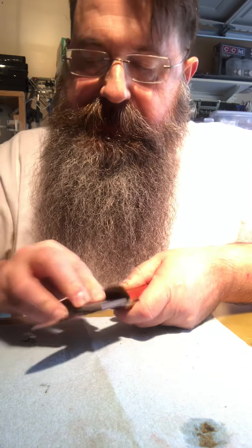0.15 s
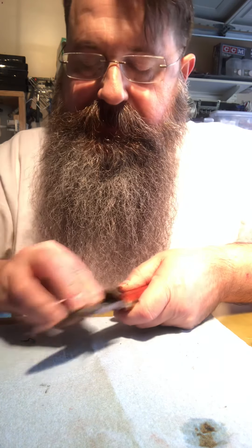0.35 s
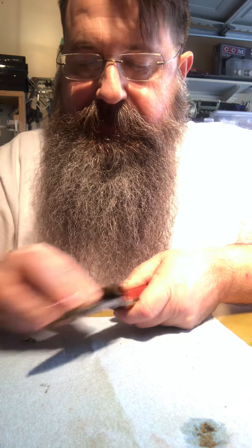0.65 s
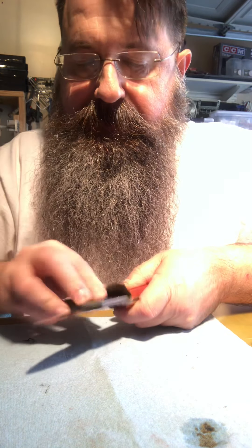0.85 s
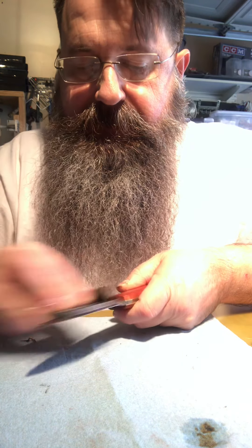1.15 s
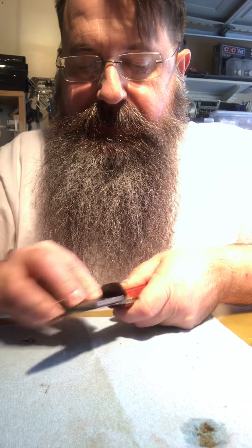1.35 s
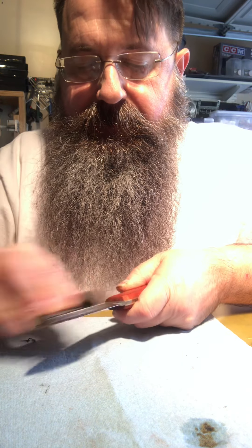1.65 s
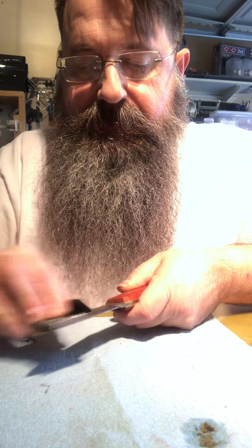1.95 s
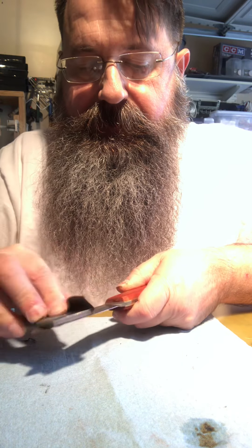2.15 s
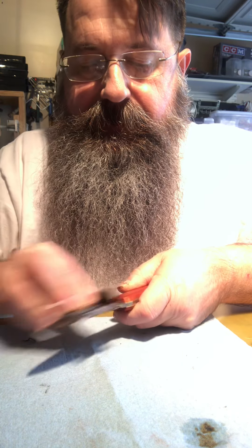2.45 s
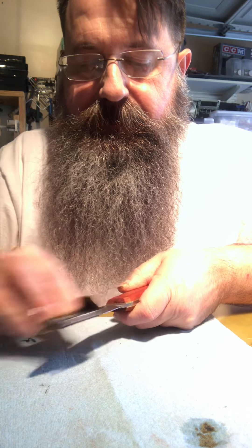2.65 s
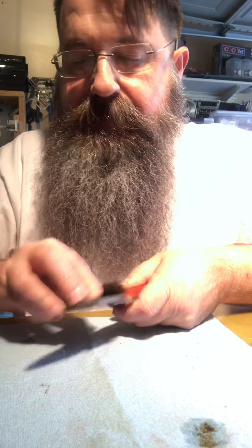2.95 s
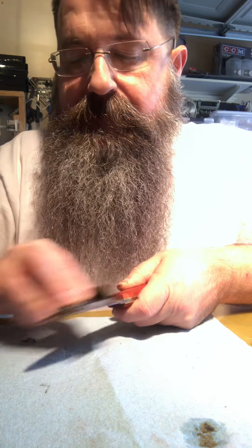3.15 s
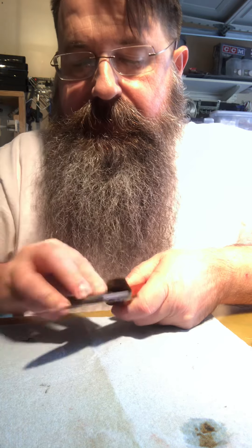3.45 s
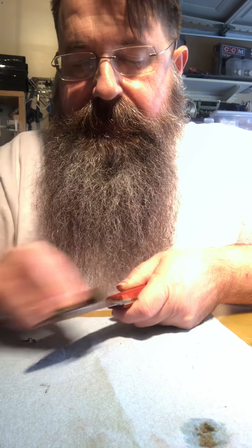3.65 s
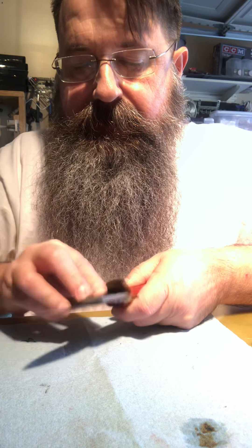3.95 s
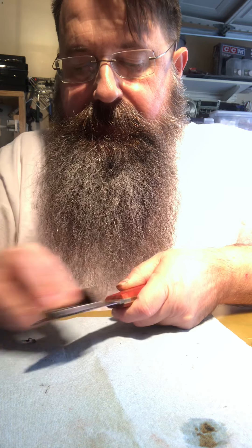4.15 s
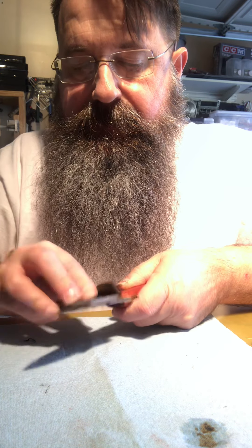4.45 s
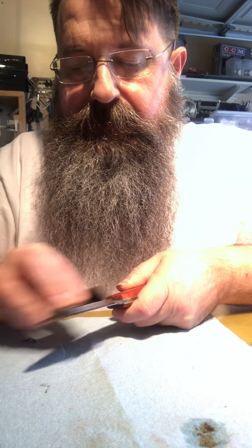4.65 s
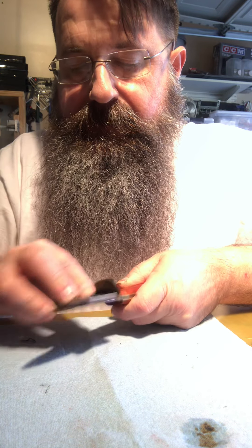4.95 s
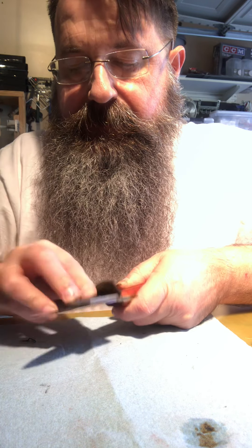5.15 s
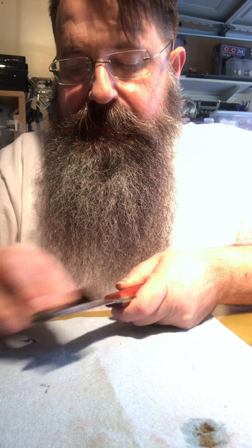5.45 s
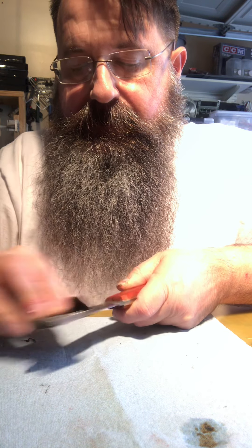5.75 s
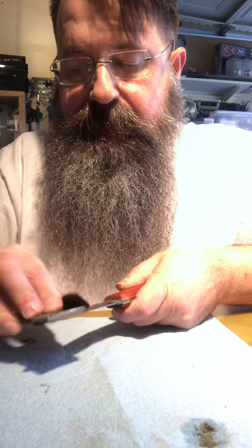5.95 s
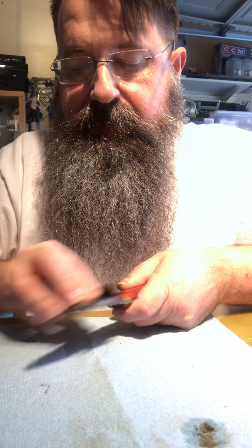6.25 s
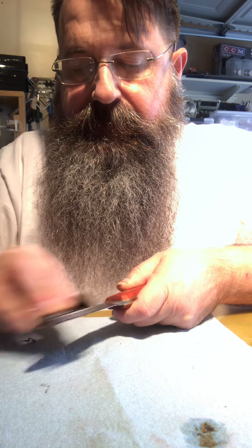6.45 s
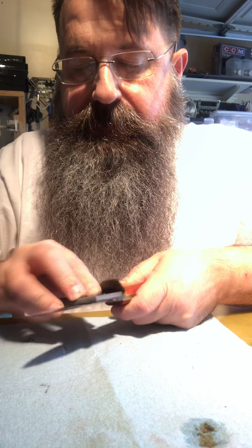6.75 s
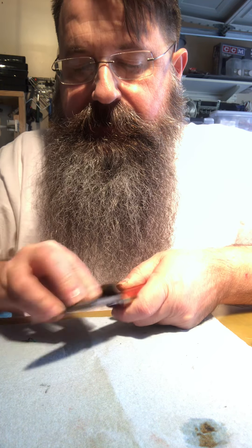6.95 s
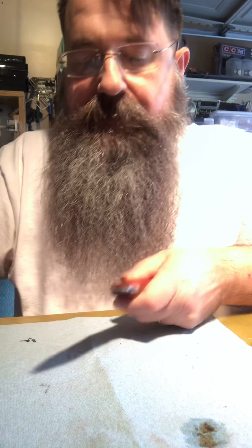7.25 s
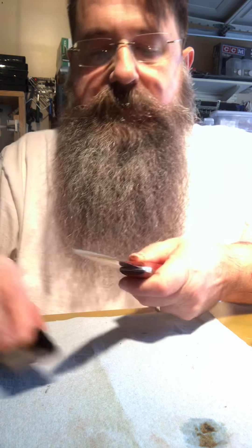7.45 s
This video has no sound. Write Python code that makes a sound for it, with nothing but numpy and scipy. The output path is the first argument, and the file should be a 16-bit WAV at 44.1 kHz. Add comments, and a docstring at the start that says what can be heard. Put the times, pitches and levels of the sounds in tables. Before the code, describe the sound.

In a small workshop with a faint mains hum, a block in wet sandpaper scrubs a hand-held knife blade at about eight strokes a second. Each stroke is a bright gritty hiss with a hollow, sliding tone. Irregular knocks against the handle crack sharply, strongest near the middle. Finally the rubbing stops, and the block brushes and clacks onto the covered bench. One microphone sits across the bench, fairly dry.

```python
"""A small workshop with mains hum and a low rush of air, one microphone across the bench.
A block in wet sandpaper rubs to and fro along a hand-held knife blade, about eight strokes a second.
Scratch noise makes the grit's hiss, and swept resonances make hollow notes that slide with the block.
Now and then the block knocks against the handle, and the gripped knife answers with short dying modes.
At the end it slips off the tip and is put down on the covered bench, with brushing noise and quick touches."""
import sys
import numpy as np
from scipy import signal
from scipy.fft import rfft, irfft
from scipy.io import wavfile

SR = 44100
rng = np.random.default_rng(int(sys.argv[2]) if len(sys.argv) > 2 else 0)


def waveform_to_disk(signal):
    """Save audio, clipped to [-1, 1], as 16-bit WAV at the path in sys.argv[1]."""
    frames = np.transpose(np.atleast_2d(signal))
    scaled = np.clip(frames, -1, 1) * 32767
    samples = np.round(scaled).astype(np.int16)
    wavfile.write(sys.argv[1], SR, samples)


N = 334719
TIME = np.arange(N) / SR  # s
BINS = np.fft.rfftfreq(N, 1 / SR)  # Hz
LIFT_OFF = 7.15  # s, the last stroke ends


def amp(db):
    """Decibels to gain."""
    return 10 ** (np.asarray(db) / 20)


def unit(x):
    """Scales to rms 1."""
    return x / np.sqrt(np.mean(x ** 2) + 1e-20)


def peaked(x, db):
    """Scales to a peak level."""
    return amp(db) * x / abs(x).max()


def read(points, hz):
    """Reads a table of values against frequency on a log-frequency axis."""
    f, value = np.transpose(points)
    return np.interp(np.log(hz + 1), np.log(f + 1), value)


def add(mix, s, sound):
    """Mixes a sound in at time s."""
    part = mix[round(s * SR):][:len(sound)]
    part += sound[:len(part)]


def coloured(x, db):
    """Gives x a spectrum, at rms 1."""
    return unit(irfft(rfft(x) * amp(db), N))


def noise():
    """White noise as long as the scene."""
    return rng.standard_normal(N)


def wander(hz):
    """Random drift of rms 1, rolled off steeply above hz."""
    return unit(irfft(rfft(noise()) / (1 + (BINS / hz) ** 4), N))


def grit(per_s, spread_db, share):
    """Countless tiny scratches as steady noise, plus a share of separate larger ones."""
    fine = noise()
    size = amp(spread_db * np.minimum(rng.exponential(1, N), 4))
    struck = rng.random(N) < per_s / SR
    grains = noise() * size * struck
    return unit(fine + share * unit(grains))


def resonate(x, hz, width):
    """A resonance that follows the curve hz: x is turned down to zero, smoothed and turned back."""
    turn = np.exp(2j * np.pi * np.cumsum(hz) / SR)
    r = np.exp(-np.pi * width / SR)
    return unit((turn * signal.lfilter([1 - r], [1, -r], x / turn)).real)


def ring(modes, detune, spread_db=0):
    """Dying modes of alternating sign; the grip shifts their pitch, the place of the blow their strength."""
    t = TIME[:SR // 4]
    out = np.zeros(len(t))
    chance = rng.uniform(-1.24, 1, (len(modes), 2))
    for k, ((hz, db, t60), (shift, strength)) in enumerate(zip(modes, chance)):
        fade = amp(db + spread_db * strength - 60 * t / t60)
        out += (-1) ** k * fade * np.sin(2 * np.pi * hz * (1 + detune * shift) * t)
    return out


# Mains hum before its slow waver: [f/Hz, rms level/dB]
HUM_TONES = [(120, -49.5), (240, -78.5), (360, -83)]
# Spectrum shape of the air in the workshop: [f/Hz, relative level per Hz/dB]
AIR_SPECTRUM = [(20, -27.5), (35, -3), (55, 6.5), (90, 7.5), (150, -2), (210, -12), (280, -12), (500, -19),
                (1500, -17.5), (2600, -19), (4000, -26), (16000, -27)]


def workshop(air_db=-56, waver_db=0.7, waver_hz=9):
    """Slightly wavering mains hum over a low rush of air."""
    hum = np.zeros(N)
    for hz, db in HUM_TONES:
        hum += amp(db) * np.sqrt(2) * np.sin(2 * np.pi * (hz * TIME + rng.random()))
    air = amp(air_db) * coloured(noise(), read(AIR_SPECTRUM, BINS))
    return hum * amp(waver_db * wander(waver_hz)) + air


# Spectrum shape of the shaken bench: [f/Hz, relative level per Hz/dB]
RUMBLE_SPECTRUM = [(20, -72), (50, 2.5), (85, -9), (150, -0.5), (230, -21), (600, -23.5), (2000, -70)]


def handling(rumble_db=-61.0, swing_db=3.5, swing_hz=11):
    """The working arms shake the bench: low noise of unsteady level that ends at lift-off."""
    level = amp(rumble_db + swing_db * wander(swing_hz))
    working = np.clip((LIFT_OFF - TIME) * 20, 0, 1)
    return level * working * coloured(noise(), read(RUMBLE_SPECTRUM, BINS))


# Pace of the hand, even between points; even-numbered strokes run towards the handle: [t/s, strokes done]
HAND_PACE = [(.01, 0), (.943, 8), (1.076, 9), (1.43, 12), (1.564, 13), (2.605, 22), (2.713, 23), (2.96, 25),
             (3.061, 26), (3.196, 27), (3.432, 29), (4.21, 35), (4.923, 41), (5.244, 44), (5.598, 47),
             (6.161, 52), (6.513, 55), (6.956, 59)]


def hand_motion(tip_lead=0.021):
    """Stroke number, phase within it (0 to 1), direction and place of the block along the blade."""
    times, done = np.transpose(HAND_PACE)
    done = np.round(done)
    progress = np.interp(TIME, np.append(times, LIFT_OFF), np.append(done, done[-1] + 1))
    # strokes towards the tip set off early by this share of a stroke
    progress += tip_lead * np.sin(np.pi / 2 * progress) ** 2
    stroke, phase = progress.astype(int), progress % 1
    push = stroke % 2 - 0.5  # +0.5 towards the tip, -0.5 towards the handle
    place = (1 - np.cos(np.pi * progress)) / 2  # 0 at the tip, 1 at the handle
    return stroke, phase, push, place


def hand_pressure(stroke, phase, ease_db=-0.6, stop_db=-15, stop_s=0.0091, stuck_db=-3, breakaway=0.11):
    """Gain from the hand's press: unsteady, easing along each stroke, lower while the wet paper clings."""
    # a knock stops the block dead, ahead of the turn
    stopped = np.zeros(N)
    for at, *_ in HANDLE_KNOCKS:
        stopped += np.exp(-((TIME - at - stop_s) / (0.5 * stop_s)) ** 4)
    unsteady = 0.98 * wander(26) + 1.18 * wander(210)  # dB: slow pressure, quick chatter
    unsteady += 1.34 * noise()[stroke]  # dB: no two strokes are quite alike
    # the paper clings at each turn, then breaks loose at this share of the stroke
    clinging = np.clip((breakaway - phase) * 20 + 0.5, 0, 1)
    db = stuck_db * clinging + ease_db * (phase - 0.5) + unsteady + stop_db * stopped
    return amp(db) * (TIME < LIFT_OFF)


def stroke_db(phase, rise, fall, start_db, stop_db, arch_db, rest=0.021):
    """Level within a stroke: the block gathers speed, glides, brakes and rests for a share of the stroke."""
    starting = np.cos(np.pi / 2 * np.clip(phase / rise, 0, 1)) ** 2
    stopping = np.clip(1 - (1 - rest - phase) / fall, 0, 1) ** 2
    return start_db * starting + stop_db * stopping + arch_db * np.sin(np.pi * phase)


def shifting(x, depth_db, count=7):
    """Broad bands swell and sink on their own as the wet paper rocks on the steel; the lowest holds the bass."""
    centres, spectrum = np.linspace(3500, 15500, count), rfft(x)
    out = np.zeros(N)
    for band in np.eye(count):
        part = irfft(spectrum * np.interp(BINS, centres, band), N)
        out += part * amp(depth_db * wander(6.8))
    return out


# Spectrum shapes of coarse rasp and fine fizz: [f/Hz, relative level per Hz/dB]
RASP_SPECTRUM = [(300, -36), (800, -67), (1400, -14.5), (2800, -13), (3700, -9), (4600, -3.5), (5400, 1),
                 (6600, 0.5), (9800, -0.5), (11500, -15.5), (16000, -55)]
FIZZ_SPECTRUM = [(4000, -45.5), (8000, -4), (10500, -6), (12300, 1), (14500, 2), (16000, -2)]
# Peaks and dips of blade and block: [f/Hz, width/Hz, level/dB]
BLADE_PEAKS = [(2690, 280, 3), (3140, 200, -0.5), (3674, 75, 4), (4000, 140, -1), (4500, 147, 5.5),
               (5256, 120, 4.5), (5600, 200, 0.5), (6670, 520, 3.5), (10400, 230, -4)]
# How hard the paper bites, before the trims below: [t/s, rasp level/dB, fizz level/dB]
PAPER_BITE = [(0, -36.5, -34), (.4, -35.5, -32.5), (.75, -37.5, -34.5), (1.35, -37, -32.5),
              (1.6, -37.5, -35), (2.25, -37.5, -34.5), (2.55, -38, -33), (2.9, -37, -32.5),
              (3.15, -37, -33.3), (3.6, -38, -33), (4.0, -38, -33), (4.499, -36.5, -33), (4.8, -39, -36.5),
              (5.4, -38.5, -36), (5.8, -38.5, -35.5), (6.3, -38.5, -34), (7.0, -37.5, -34)]
# Swell and stop of each stroke; the fizz needs more speed than the rasp. One row each:
# [rise/share of stroke, fall/share of stroke, level at start/dB, level at stop/dB, extra at mid-stroke/dB]
RASP_SWELL = (0.2227, 0.12, -12.5, -28, -3)
FIZZ_SWELL = (0.26, 0.1448, -20.5, -35, 3.0)
# Hollow notes, loudest shortly after a turn: columns as above
HOLLOW_SWELL = (0.1, 0.34, -6, -17, -4.5)
# Hollow notes under the hand, before drift: [f at tip/Hz, f at handle/Hz, level at tip/dB, level at handle/dB]
HOLLOW_NOTES = [(1105, 1810, -26.5, -18.5), (2040, 2550, -15.5, -22.5), (3710, 4000, -21.5, -20)]


def hollow_notes(judder, place, width_hz=330, drift=0.05, flutter_db=2.5):
    """Scratches drive resonances whose pitch and level slide with the block."""
    out = np.zeros(N)
    for tip_hz, handle_hz, tip_db, handle_db in HOLLOW_NOTES:
        grip = 1 + drift * wander(5)
        hz = grip * (tip_hz + (handle_hz - tip_hz) * place)
        note = resonate(grit(1300, 4.0, 0.61), hz, width_hz)
        note = resonate(note, hz, width_hz)  # the second pass steepens the skirts
        out += judder * amp(tip_db + (handle_db - tip_db) * place + flutter_db * wander(20)) * note
    return out


def sanding(rasp_db=-3.5, fizz_db=-4.5, hollow_db=-1.7, tip_rasp_db=3.0, tip_fizz_db=3.0, lift_s=0.09):
    """Grit scratches the steel while the block moves, and sinks at each turn; hollow notes slide with it."""
    stroke, phase, push, place = hand_motion()
    s, rasp_bite, fizz_bite = np.transpose(PAPER_BITE)
    press = hand_pressure(stroke, phase)
    # the factors of push are level differences between strokes to the tip and to the handle (dB)
    drag = press * amp(np.interp(TIME, s, rasp_bite) - 0.8 * push)
    coarse = drag * amp(stroke_db(phase, *RASP_SWELL))
    judder = drag * amp(hollow_db - 1.2 * push + stroke_db(phase, *HOLLOW_SWELL))
    fine = press * amp(np.interp(TIME, s, fizz_bite) + stroke_db(phase, *FIZZ_SWELL))
    fine *= np.clip((LIFT_OFF - TIME) / lift_s, 0, 1)  # the fizz goes first as the paper leaves the steel

    body = sum(db * np.exp(-((BINS - hz) / width) ** 2) for hz, width, db in BLADE_PEAKS)
    rasp = coloured(grit(3000, 2.2, 0.4), read(RASP_SPECTRUM, BINS) + body)
    fizz = coloured(grit(5000, 2.08, 0.27), read(FIZZ_SPECTRUM, BINS) + body)
    # the free tip sounds more readily than the gripped end
    towards_tip = 0.5 - place
    hiss = amp(rasp_db + tip_rasp_db * towards_tip) * coarse * rasp
    hiss += amp(fizz_db + tip_fizz_db * towards_tip) * fine * fizz
    return shifting(hiss, depth_db=1.22) + hollow_notes(judder, place)


# Coarse grit snags under the paper: [t/s, peak level/dB, f/Hz]
GRIT_SNAGS = [(0.029, -41, 1400), (0.194, -25.5, 7000), (.258, -38.5, 1380), (0.496, -39.5, 2150),
              (1.450, -44, 1310), (2.157, -40.5, 2260), (3.082, -40.5, 1350), (4.346, -43, 2060),
              (5.489, -46, 1210)]


def snags(length_s=0.0021):
    """Short scrapes where a coarse grain catches: noise bursts in a band around one frequency."""
    out, t = np.zeros(N), TIME[:SR // 20]
    for s, db, hz in GRIT_SNAGS:
        scrape = t * np.exp(-t / length_s) * rng.standard_normal(len(t))
        band = signal.butter(2, [0.77 * hz, 1.29 * hz], "band", fs=SR)
        add(out, s - length_s, peaked(signal.lfilter(*band, scrape), db))  # its swell peaks at s
    return out


# The block meets the handle, last of all slips off the tip: [t/s, peak level/dB, lowest f/Hz, hardness f/Hz]
HANDLE_KNOCKS = [(0.363, -20.5, 930, 1080), (.8080, -25.5, 335, 2200), (1.058, -28.5, 336, 2440),
                 (1.7801, -30, 413, 1030), (2.006, -15, 510, 3540), (2.4675, -21, 546, 2250),
                 (2.6899, -7, 664, 2700), (3.4102, -14.5, 576, 2800), (3.6712, -6, 517, 4400),
                 (3.9253, -3.5, 530, 6440), (6.2580, -23, 503, 1960), (7.118, -27.5, 224, 1240)]
# Modes of the gripped knife before each blow's small shifts: [f/Hz, level/dB, t60/s]
KNIFE_MODES = [(356, -14, 0.057), (577, -16.5, 0.024), (1236, 3.5, 0.0052), (1425, 1.5, 0.008),
               (1860, 1, 0.0066), (2550, -4.5, 0.015), (2870, 0.5, 0.011), (4130, 8.5, 0.004),
               (4760, 3.5, 0.0086), (5270, 10.5, 0.0054), (6850, 14.5, 0.0023), (12700, 0, 0.0022)]


def knife_contact(t, rattle_s=0.0013, rattle=0.17, rebound_s=0.001348, rebound=0.25):
    """Force of one blow: a click, a brief rattle, and a rebound about rebound_s later."""
    contact = rattle * np.exp(-t / rattle_s) * (rng.random(len(t)) - 0.5)
    contact[0] = 1
    contact[round(rebound_s * rng.uniform(0.7, 1.3) * SR)] += rebound
    return contact


def knocks(crack_db=-17, crack_s=0.0052, thud_db=-36, thud_lag=0.016, thud_s=0.0078, thud_hz=75):
    """Each knock cracks and rings the gripped knife; a moment later the jolt reaches the bench via the wrist."""
    out, t = np.zeros(N), TIME[:SR // 8]
    thud = t * np.exp(-t / thud_s) * np.sin(2 * np.pi * thud_hz * t)
    for s, db, low_hz, hard_hz in HANDLE_KNOCKS:
        # a softer contact excites less treble
        blow = signal.lfilter(*signal.butter(2, min(hard_hz, SR / 3), fs=SR), knife_contact(t))
        modes = ring(KNIFE_MODES, detune=0.025, spread_db=2)
        knock = peaked(signal.fftconvolve(blow, modes)[:len(t)], 0)
        crack = np.diff(np.exp(-t / crack_s) * rng.standard_normal(len(t)), prepend=0)
        knock += peaked(crack, crack_db)
        # so small a body radiates little bass
        bass_cut = signal.butter(4, low_hz, "high", fs=SR, output="sos")
        add(out, s, peaked(signal.sosfilt(bass_cut, knock), db))
        add(out, s + thud_lag, peaked(thud, thud_db + 0.35 * db))
    return out


# Sleeve and wet paper brush the blade tip and the bench cover: [t at peak/s, level/dB, rise/s, fade/s]
BRUSH_STROKES = [(7.10, -44.5, 0.012, 0.036), (7.131, -45, 0.014, 0.0028), (7.185, -51.5, 0.014, 0.028),
                 (7.30, -58.5, 0.066, 0.061), (7.475, -49, 0.027, 0.047), (7.516, -29, 0.0086, 0.021),
                 (7.556, -34, 0.0059, 0.018)]
# Spectrum shape of the brushing: [f/Hz, relative level per Hz/dB]
BRUSH_SPECTRUM = [(200, 1), (600, -4.5), (1800, 1.5), (3800, -1), (5000, -3.5), (8000, -3.5), (16000, -12)]
# Fingers and block touch down: [t/s, clack peak level/dB, bench thud peak level/dB]
TOUCH_DOWNS = [(7.176, -37, -96.5), (7.505, -17, -39), (7.510, -20, -27), (7.518, -15, -29.5),
               (7.53, -29, -28), (7.556, -32, -36)]
# Modes of the clack: [f/Hz, damping/Hz (t60 is 0.6 / damping), level/dB]
CLACK_MODES = [(1870, 42, -0.5), (2660, 38, 2.5), (3540, 100, 6.5), (3900, 18, -2.5), (4370, 110, -3),
               (5700, 58, -20), (6200, 110, 3), (8600, 150, -23)]
# Modes of the bench: [f/Hz, level/dB, t60/s]
BENCH_MODES = [(77, 3, 0.12), (153, 9, 0.087), (321, 1.5, 0.11), (394, 4, 0.075), (690, -5, 0.053),
               (1230, 3, 0.041)]


def put_down(brush_db=0, soft_hz=7500):
    """The block leaves the blade, brushes the bench cover and lands in a few quick touches."""
    swells = []
    for s, db, rise_s, fade_s in BRUSH_STROKES:
        swells.append(amp(db) * np.exp(-np.maximum((s - TIME) / rise_s, (TIME - s) / fade_s)))
    level = np.max(swells, axis=0) * amp(0.7 * wander(68))
    rustle = coloured(grit(1200, 3.3, 0.81), read(BRUSH_SPECTRUM, BINS))
    dull = signal.lfilter(*signal.butter(2, min(soft_hz, SR / 3), fs=SR), rustle)
    firm = (level / level.max()) ** 0.12  # a light touch has less treble
    out = amp(brush_db) * level * (firm * rustle + (1 - firm) * dull)
    clack_modes = [(hz, db, 0.6 / damping) for hz, damping, db in CLACK_MODES]
    for s, clack_db, bench_db in TOUCH_DOWNS:
        add(out, s, peaked(ring(clack_modes, detune=0.022), clack_db))
        add(out, s, peaked(ring(BENCH_MODES, detune=0.04), bench_db))
    return out


# Decay of the workshop's diffuse tail: [f/Hz, t60/s]
ROOM_DECAY = [(150, 0.54), (1000, 0.39), (3000, 0.62), (7000, 0.28), (15000, 0.24)]


def room(x, wet_db=-17.5, early_db=-16, echoes=6):
    """A few echoes from the bench and shelves, then a short diffuse tail of decaying noise."""
    hz, t, z = signal.stft(rng.standard_normal(SR // 2), SR, nperseg=256)
    decay = amp(-60 * t / read(ROOM_DECAY, hz)[:, None])
    tail = signal.istft(z * decay, SR, nperseg=256)[1]
    tail *= np.clip(TIME[:len(tail)] / 0.0065, 0, 1)  # the tail builds up over 6.5 ms
    response = amp(wet_db) * tail / np.linalg.norm(tail)
    delays = (rng.uniform(0.001, 0.007, size=echoes) * SR).astype(int)
    response[delays] += amp(early_db) * rng.choice([-1, 1], size=echoes) / np.sqrt(echoes)
    response[0] += 1  # the direct sound
    return signal.fftconvolve(x, response)[:N]


def scene():
    """Everything reaches one microphone across the bench, fed equally to both channels."""
    work = sanding() + handling() + knocks() + snags() + put_down()
    mono = room(work) + workshop()
    return np.array([mono, mono])


def record(dry, edge_hz=15850):
    """A steep band limit: little passes above edge_hz."""
    lowpass = signal.firwin(511, edge_hz, window=("kaiser", 9), fs=SR)
    return signal.oaconvolve(dry, lowpass[None], "same")


dry = scene()
out = record(dry)
waveform_to_disk(out)
```